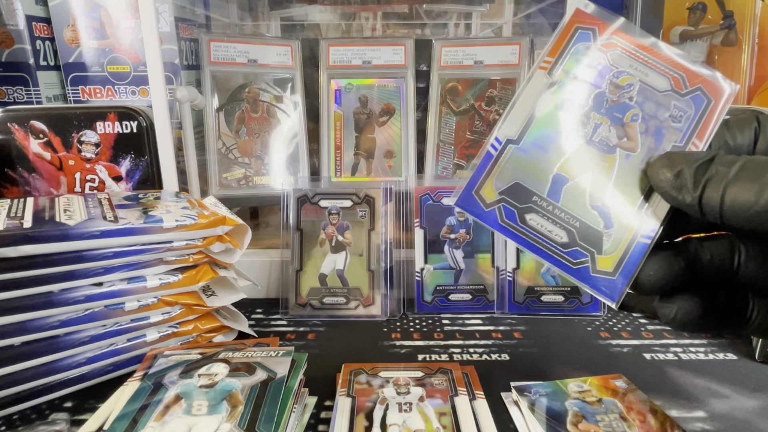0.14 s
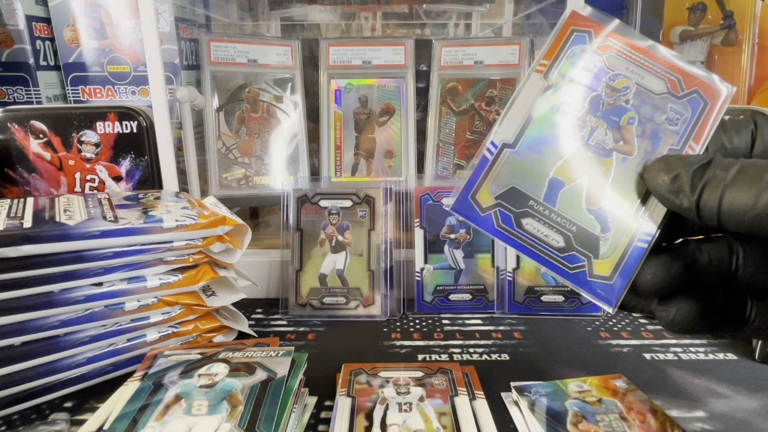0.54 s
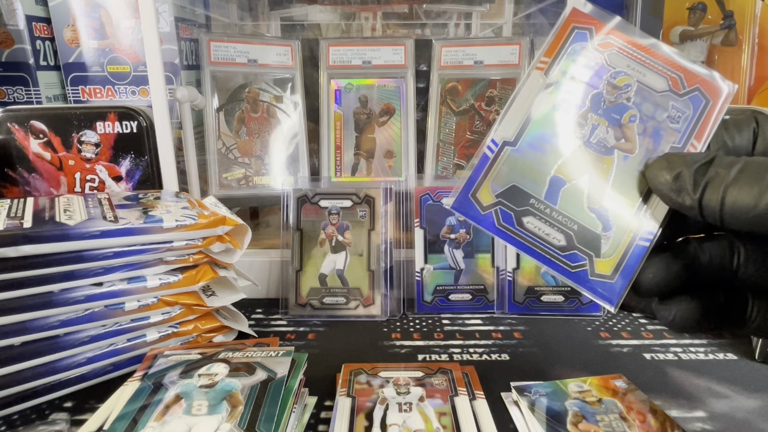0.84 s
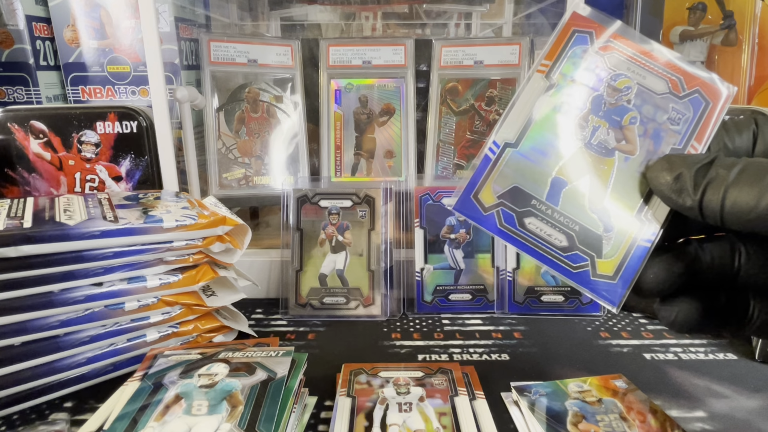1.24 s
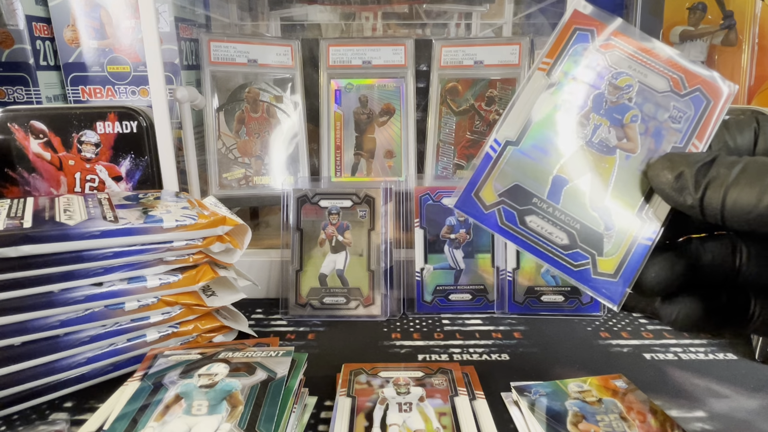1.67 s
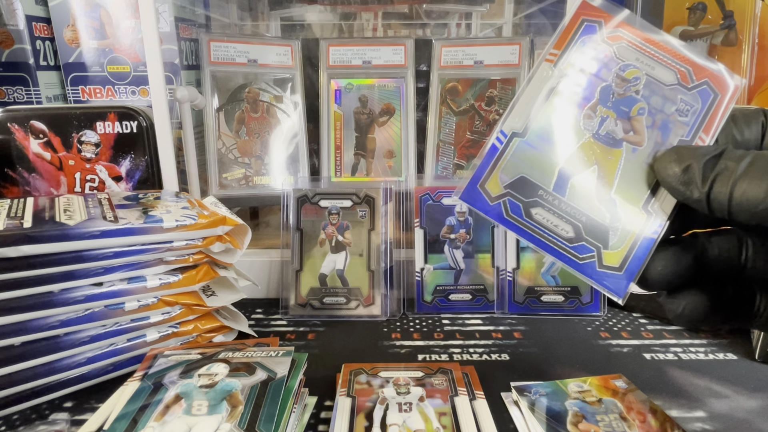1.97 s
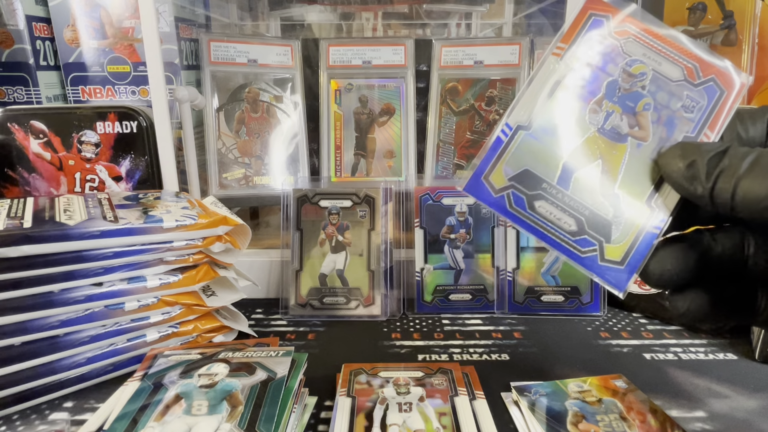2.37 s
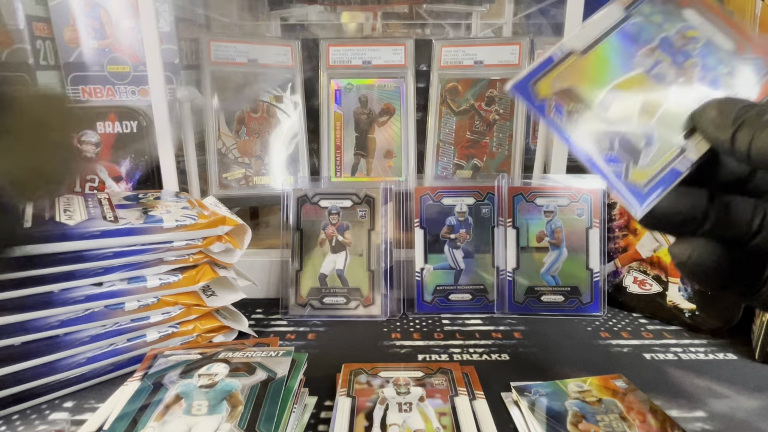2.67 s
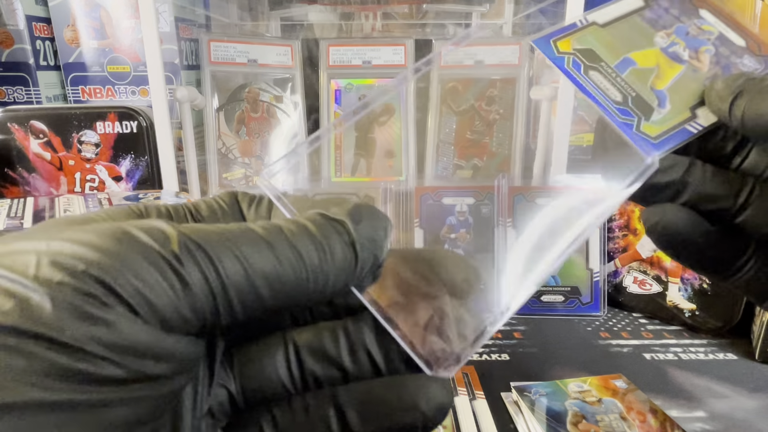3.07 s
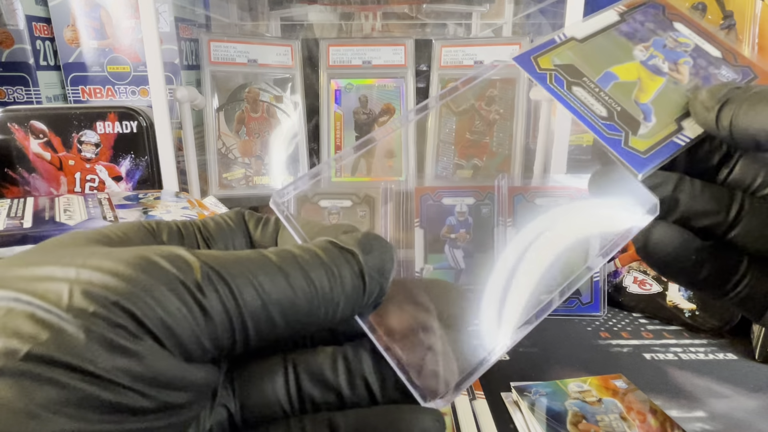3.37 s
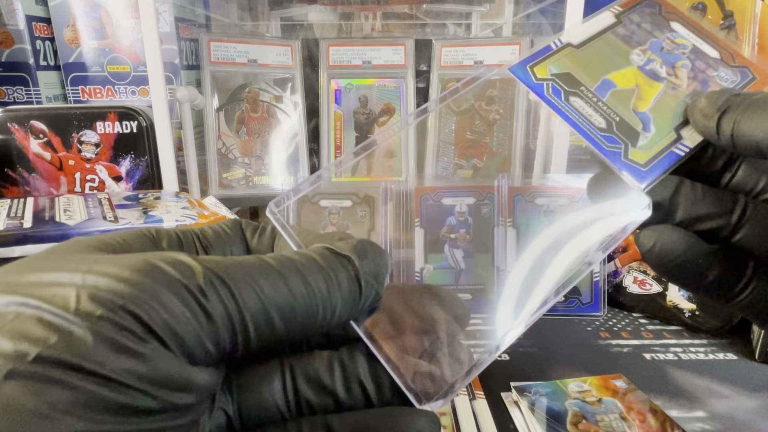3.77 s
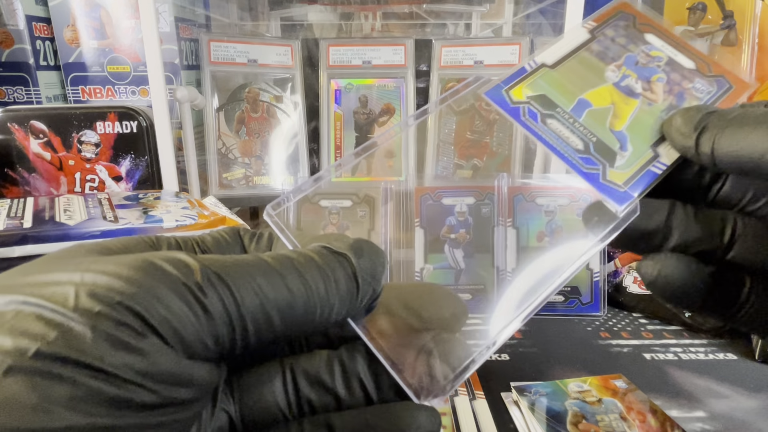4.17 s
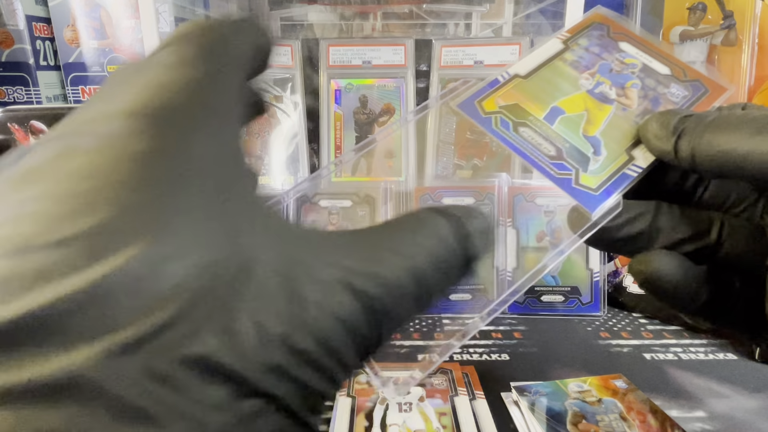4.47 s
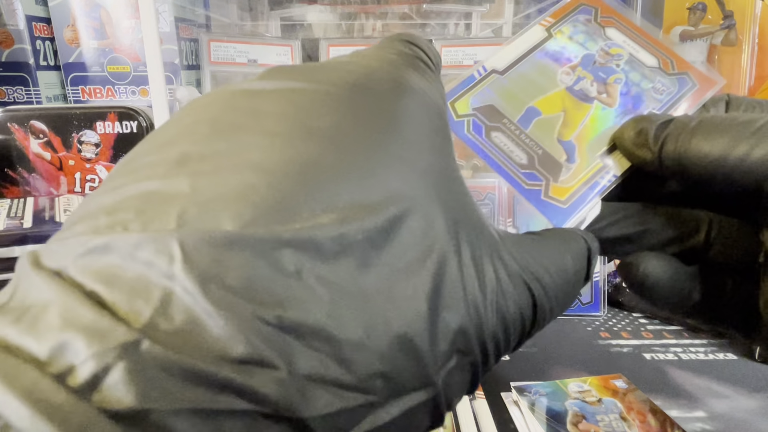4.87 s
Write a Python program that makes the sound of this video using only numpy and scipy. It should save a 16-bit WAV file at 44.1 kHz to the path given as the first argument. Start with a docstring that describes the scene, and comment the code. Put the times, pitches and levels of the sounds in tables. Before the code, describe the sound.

Close handling of a thin plastic card sleeve in gloved fingers, in a small room with quick desk reflections and a faint, wavering low hum. From 0 to 0.65 s come scattered dry snaps and short papery drags; a softer patch follows to 1.1 s. Snaps cluster at 1.1-1.4 s, and a strong crackling snap with a dull bump lands near 1.48 s. Light rubbing leads to squeaky drags and small bumps at 2.0-2.3 s. Then it nearly falls silent, with faint scuffs, hissy slides and tiny ticks until about 4.2 s. Small edge clicks gather at 4.25-4.6 s and sharpen at 5.1-5.4 s. At 5.64 s one hard, bright plastic knock is the loudest event, very short. Gritty sliding, a faint squeak and a scuff near 6.17 s follow, then quiet ticks. A soft thump at 7.0 s and a firmer double bump with a click at 7.2 s close it.

```python
"""A thin sleeve round a trading card, held in gloved hands: shaped friction noise rings card and film modes.
Stick-slip squeaks are short tones of unsteady pitch. Feeding the card into a rigid plastic holder gives
soft hiss, ticks and scuffs from friction noise. One hard knock and dull hand bumps are smooth pushes
on decaying modes. Early echoes and a faint tail form the small room, over a wavering mains hum and
coloured noise."""
import sys
import numpy as np
from scipy import signal
from scipy.fft import rfft, irfft
from scipy.io import wavfile
from scipy.ndimage import map_coordinates

SR = 44100
rng = np.random.default_rng(int(sys.argv[2]) if len(sys.argv) > 2 else 0)


def unload_audio(sound):
    """Save the sound as a 16-bit wav file, at the path given as the first command line argument."""
    columns = np.transpose(np.atleast_2d(sound))
    # keep every value between -1 and 1, then stretch to whole-number steps
    steps = np.round(np.clip(columns, -1, 1) * 32767)
    wavfile.write(sys.argv[1], SR, steps.astype(np.int16))


N = 319284

# Contact levels are relative drives; brightness is scratch, hiss or edge level relative to ring or body.
# fingers rub the sleeve: start t/s, length/s, card ring level/dB, brightness/dB
RUBS = [(0.0, 0.058, -55.5, -11.5), (.17, 0.047, -60.5, -7), (.27, 0.061, -60.5, -3), (.82, 0.23, -64, -4),
        (1.13, .06, -60.5, -11), (1.39, 0.51, -58.5, -7), (1.97, .25, -47.5, -8.5)]
# sleeve sticks and snaps free: t/s, card ring level/dB, brightness/dB
SNAPS = [(.057, -35.5, -36), (.12, -30, -19), (0.166, -43, -24), (.252, -32, -15), (.336, -37, -15.5),
         (0.579, -29, -18.5), (.652, -32.5, -26), (0.894, -41.5, -1.5), (1.0856, -56, 11.5),
         (1.11, -45, 16.5), (1.1197, -59, 18), (1.1631, -31.5, -8.5), (1.218, -32, -21), (1.248, -28, -16),
         (1.299, -40, -24), (1.378, -34, -16), (1.475, -21, -15), (1.4825, -16.5, -22.5),
         (2.222, -29, -13.5), (2.967, -51.5, -34)]
# sleeve drags under a finger: peak t/s, length/s, card ring level/dB
DRAGS = [(0.148, .018, -44.5), (0.623, 0.035, -39), (0.975, .012, -43.5), (1.153, 0.039, -41),
         (1.416, .014, -32.5), (1.473, .007, -24), (1.514, .022, -35.5), (1.586, .014, -38),
         (1.685, 0.057, -43), (1.798, 0.019, -40.5), (1.83, .014, -44), (1.865, 0.0091, -45),
         (2.014, 0.033, -29.5), (2.045, 0.005, -27), (2.1, 0.018, -29.5), (2.23, 0.033, -37.5),
         (2.317, 0.0081, -88)]
# short film rings near 3 kHz, often with a snap, tick or push: t/s, level/dB
FILM_RINGS = [(0.135, -43), (.148, -56.5), (0.582, -28.5), (.588, -46), (.654, -40.5), (1.479, -27),
              (1.809, -51), (1.866, -53), (2.22, -38), (2.388, -67.5), (2.531, -51.5), (2.653, -52.5),
              (2.791, -62), (4.35, -52), (4.385, -53), (4.425, -54), (5.138, -58), (5.213, -52),
              (6.336, -54.5)]
# plastic sticks and lets go: centre t/s, Gaussian sigma/s, pitch at centre f/Hz, level/dB
SQUEAKS = [(0.15, 0.016, 1029, -44), (1.221, .0036, 1080, -36), (2.005, 0.0081, 1097, -24.5),
           (2.056, .004, 755, -34), (2.109, .004, 753, -31), (2.19, .016, 880, -34),
           (2.116, .004, 2183, -40), (2.225, .006, 1950, -32), (2.241, .0036, 884, -34.5),
           (2.432, 0.009, 2350, -67.5), (5.944, 0.0094, 1746, -52), (6.174, 0.0018, 1774, -47)]
# sleeve is pushed along the holder: start t/s, length/s, body level/dB, brightness/dB
PUSHES = [(2.393, 0.07, -79, -5), (2.513, 0.12, -69.5, 6), (2.71, 0.06, -75, 8), (2.86, 0.23, -86, 4),
          (3.999, 0.056, -86, 7), (4.165, 0.028, -72.5, 10), (4.339, 0.11, -67, 4), (4.496, 0.1, -78, 12),
          (4.75, 0.32, -85.5, 6.5), (5.158, 0.2, -72, 4.5), (5.654, 0.059, -62.5, 0.5),
          (5.782, 0.13, -65.5, 5), (5.926, 0.055, -61, -3.5), (6.127, 0.051, -76, 11.5),
          (6.347, 0.084, -70.5, 2.5), (6.525, 0.051, -82, 10.5), (6.776, 0.044, -86, 9.5),
          (7.005, 0.13, -77, 4)]
# edge catches on the holder: t/s, body level/dB, brightness/dB
TICKS = [(3.049, -76.5, 11), (3.14, -78, 9), (3.28, -72, 1), (4.246, -66, 4), (4.342, -54, -8.5),
         (4.402, -64, -3), (4.4499, -53, 11), (4.594, -66, 5.5), (5.137, -57.5, -2.5), (5.187, -41.5, -11),
         (5.215, -47, -11), (5.4183, -39, 0), (5.702, -50, -0.5), (6.357, -48.5, -4.5),
         (6.9813, -51.5, -21), (7.2037, -40, 2)]
# sleeve and gloves scuff over the holder: peak t/s, length/s, body level/dB, brightness/dB
SCUFFS = [(2.429, 0.0093, -61.5, -21), (2.559, 0.011, -52, 1.5), (2.639, 0.025, -68, 11.5),
          (5.642, 0.012, -41, -9.5), (6.15, 0.021, -49, -7), (6.172, 0.0058, -34, -14),
          (7.138, 0.019, -61.5, -2.5), (7.21, 0.0099, -40.5, -4.5)]
# card knocks on the holder and rebounds: t/s, level/dB
KNOCKS = [(5.64, -4), (5.6409, -10.5)]
# dull bumps of the hands: t/s, level/dB, contact half width at 1/e/s
BUMPS = [(1.251, -48, 0.00086), (1.477, -21.5, 0.0011), (1.515, -34.5, .0007), (1.812, -36.5, 0.00093),
         (2.015, -28.5, 0.00044), (2.11, -26.5, 0.00021), (2.890, -44, 0.00044), (3.287, -54.5, .001),
         (5.642, -25, 0.00047), (6.184, -42.5, 0.00069), (6.9885, -22, 0.00097), (7.206, -24.5, 0.0001),
         (7.217, -15, 0.00038)]
# resonances of card, film and holder: f/Hz, width/Hz, level/dB
CARD_MODES = [(186.2, 35, -5.5), (386.3, 130, -10), (752, 167, -3.5), (1053, 98, 2.5), (1538, 220, -6),
              (1648, 120, 0), (2106, 110, -11.5)]
FILM_MODES = [(2664, 350, -3), (3030, 510, -0.5)]
HOLDER_MODES = [(405, 250, -5), (800, 600, -2), (1680, 160, 6), (2440, 760, 1.5), (3100, 530, -2.5)]
# ringing after knock and bump: f/Hz, level/dB, t60/s, left over right level/dB, left lead/s
KNOCK_MODES = [(265, -17.5, 0.018, 3, 0.0035), (375, -20.5, 0.073, 0.5, 0.0063),
               (787, -14.5, 0.014, 5, .00017), (1144, -8, .016, 5, .00043),
               (1645, 2.5, 0.013, -2.5, .00007), (2250, -23.5, .02, -5, -0.02)]
BUMP_MODES = [(105, -22, 0.18, 1.5, 0.0087), (177, -3.5, 0.03, 0, -0.0076), (270, -3, 0.014, 5, 0.0086),
              (400, -21, 0.006, 2, -0.014), (693, -11.5, .04, -1.5, -.00015), (1010, -17, 0.039, -1, 0.022)]
# spectra of sleeve scratch, holder edge, sliding hiss and room noise: f/Hz, relative density level/dB
SCRATCH = [(2500, -5), (3700, -6), (4400, 0), (4900, 0), (5600, 3.5), (6700, -1.5), (8000, -9.5),
           (11500, -17.5), (13000, -29.5), (14500, -33)]
EDGE = [(2000, -28.5), (3200, -1), (6400, -2), (8500, -10.5), (11500, -6), (15500, -23.5)]
HISS = [(2000, -15), (3300, 3), (4800, 3), (6500, 5), (8200, -4.5), (10500, 0), (12500, -9), (14000, -17.5),
        (16000, -27)]
ROOM_TONE = [(25, -12.5), (42, 0), (80, 0), (130, -7), (280, -4.5), (400, -15), (600, -23.5), (1000, -29.5),
             (2500, -36), (6000, -34), (11000, -45.5), (15000, -57)]
# desk echoes, one list per channel (left, right): delay/s, signed linear gain [1]
ECHOES = [
    [(.0037, 0.061), (.0057, -0.13), (.0093, 0.24)],
    [(.0037, -0.22), (.0068, 0.24), (.0112, 0.35)],
]
# background sinks and returns: centre t/s, half width at 1/e/s, hum depth/dB
HUM_DIPS = [(.1, 0.32, 13.5), (2.25, 0.32, 5), (3.856, 0.39, 12), (5.692, .3, 11.5)]

RUB_ATTACK_S, RUB_RELEASE_S = 0.0063, 0.029
RUB_UNEVEN_DB, RUB_UNEVEN_PER_S = 3, 40
SNAP_RISE_S, SNAP_FALL_S = 0.0003, 0.003
DRAG_RISE_SHARE, DRAG_FALL_SHARE = 0.59, 0.45  # of its length
# scratch of a drag at the usual ring level; scratch dB per dB of ring
DRAG_SCRATCH_DB, DRAG_SCRATCH_DB_PER_DB, USUAL_DRAG_DB = -51.5, 0.97, -39
FILM_DB, FILM_FROM_CARD = -7.5, 0.55  # offset from the card/scratch blend; card's share in it
FILM_RING_RISE_S, FILM_RING_FALL_S = 0.00061, 0.006
SQUEAK_SAG_PER_S = 2.5  # exponential fall of pitch
PUSH_ATTACK_S, PUSH_RELEASE_S = 0.029, 0.072
TICK_RISE_S, TICK_FALL_S = 0.00015, 0.0021
SCUFF_RISE_SHARE, SCUFF_FALL_SHARE = 0.37, 1  # of its length
KNOCK_CONTACT_S = 0.00019
REBOUND_S, REBOUND_DB = 0.0066, -10
SETTLE_S, SETTLE_DB, SETTLE_LOSS_DB = 0.022, -13.5, 3  # spacing, first touch, loss per further touch
PATCH_HZ, PATCH_S = 531.4, 0.016  # width and life of a passing resonance of flexing plastic
HUM_DB = -56.5  # before dips and flutter
HUM_FLUTTER_DB, HUM_FLUTTER_PER_S = 2.85, 15
CUTOFF_HZ = 16000


def sleeve():
    """Friction on the sleeve rings card and thin film, and scratches in the treble."""
    uneven = from_db(RUB_UNEVEN_DB * drift(RUB_UNEVEN_PER_S))
    rub_ring, rub_scratch = uneven * holds(RUBS, RUB_ATTACK_S, RUB_RELEASE_S)
    on_card, on_film, on_surface = slips()
    short_ring, = strokes([(s, FILM_RING_RISE_S, FILM_RING_FALL_S, db) for s, db in FILM_RINGS])

    def card_ring():
        rub = rub_ring * from_db(4) * friction(270, 6.2, 0.23)
        slipping = from_db(-1.5) * contact(on_card, 0.69)
        return resonate(rub + slipping, CARD_MODES, grip_db=4.5)

    def film_ring():
        rub = rub_scratch * from_db(2.4) * friction(300, 5.0, 0.42)
        slipping = contact(on_film, 0.99)
        return resonate(rub + slipping + contact(short_ring, 0.28), FILM_MODES, grip_db=3.5)

    def surface_scratch():
        rub = rub_scratch * friction(1200, 6.4, 0.7)
        return colour(rub + from_db(-0.5) * contact(on_surface, 0.87), SCRATCH)

    card = spread(card_ring, 0.00037, 2.2, 0.28)
    film = spread(film_ring, 0.00044, 0.3, 0.5)
    scratch = spread(surface_scratch, 0.00043, 6.7, 0.46)
    ringing = flex(high_pass(card, 130) + high_pass(film, 1200), depth_db=3.5)
    return ringing + high_pass(flex(scratch, depth_db=7.0), 2500)


def slips():
    """Snaps share one abrupt shape; drags swell and die with their length, louder ones scratching more."""
    rows = []
    for s, db, bright in SNAPS:
        rows.append(slip(s, SNAP_RISE_S, SNAP_FALL_S, db, db + bright))
    for s, length, db in DRAGS:
        scratch_db = DRAG_SCRATCH_DB + DRAG_SCRATCH_DB_PER_DB * (db - USUAL_DRAG_DB)
        rows.append(slip(s, DRAG_RISE_SHARE * length, DRAG_FALL_SHARE * length, db, scratch_db))
    return strokes(rows)


def slip(s, rise, fall, card_db, scratch_db):
    """A slip drives the film at a blend of card ring and scratch levels."""
    film_db = FILM_DB + FILM_FROM_CARD * card_db + (1 - FILM_FROM_CARD) * scratch_db
    return s, rise, fall, card_db, film_db, scratch_db


def squeaks(waver=0.065, overtone_db=-15):
    """Brief stick-slip tones of unsteady, sagging pitch with a weak octave."""
    t, out = seconds(), np.zeros(N)
    unsteady = 1 + waver * drift(400)
    for s, sigma, hz, db in SQUEAKS:
        near = np.abs(t - s) < 4 * sigma
        since = t[near] - s
        pitch = hz * unsteady[near] * np.exp(-SQUEAK_SAG_PER_S * since)
        phase = 2 * np.pi * np.cumsum(pitch) / SR
        tone = np.sin(phase) + from_db(overtone_db) * np.sin(2 * phase)
        out[near] += from_db(db) * np.exp(-(since / sigma) ** 2 / 2) * tone
    return place(out, 0.00038, 7.6)


def holder():
    """The sleeve glides over stiff plastic with a gritty hiss and catches on its edges."""
    glide_body, glide_hiss = holds(PUSHES, PUSH_ATTACK_S, PUSH_RELEASE_S)
    on_body, on_edge = catches()

    def body_ring():
        glide = glide_body * from_db(2.0) * friction(250, 6.2, 0.8)
        catching = from_db(1.0) * contact(on_body, 0.6)
        return resonate(glide + catching, HOLDER_MODES, grip_db=4.5)

    def sliding_hiss():
        uneven = from_db(1.8 * drift(50))
        return colour(glide_hiss * uneven * friction(400, 4.0, 0.7), HISS)

    def edge_noise():
        return colour(contact(on_edge, 1.0), EDGE)

    body = spread(body_ring, 0.00005, 0.8, 0.93)
    hiss = spread(sliding_hiss, 0.00005, 1.9, 1.34)
    edge = spread(edge_noise, 0.00005, 1.5, 1.0)
    return flex(body, depth_db=5.0) + high_pass(flex(hiss + edge, depth_db=4.0), 1700)


def catches():
    """Short ticks and longer scuffs drive the holder's body and its edge."""
    rows = [(s, TICK_RISE_S, TICK_FALL_S, db, db + bright) for s, db, bright in TICKS]
    for s, length, db, bright in SCUFFS:
        rows.append((s, SCUFF_RISE_SHARE * length, SCUFF_FALL_SHARE * length, db, db + bright))
    return strokes(rows)


def blows():
    """Hard knock of plastic on plastic and soft bumps of the hands, each ringing its modes."""
    knock = strike([(s, db, KNOCK_CONTACT_S) for s, db in KNOCKS], KNOCK_MODES)
    bumps = strike(bounces(), BUMP_MODES)
    return high_pass(knock, 73) + high_pass(bumps, 65)


def bounces(count=3):
    """Every bump springs back once, then the hand settles in soft touches."""
    after = [(0, 0), (REBOUND_S, REBOUND_DB)]
    after += [(SETTLE_S * (k + 1), SETTLE_DB - SETTLE_LOSS_DB * k) for k in range(count)]
    return [(s + delay, db + loss, contact_s) for s, db, contact_s in BUMPS for delay, loss in after]


def strike(blows, modes):
    """Smooth pushes set decaying modes ringing; each mode has its own stereo level and lead."""
    t, push, out = seconds(), np.full(N, 1e-18), 0
    for s, db, contact_s in blows:
        near = slice(int((s - 10 * contact_s) * SR), int((s + 10 * contact_s) * SR))
        pulse = np.exp(-((t[near] - s) / contact_s) ** 2)
        push[near] += from_db(db) * pulse / (contact_s * SR * np.sqrt(np.pi))  # area set by level
    change = signal.lfilter([1, 0, -1], [2], push) + 1e-18
    for hz, db, t60, left_db, lead_s in modes:
        r, w = from_db(-60 / (t60 * SR)), 2 * np.pi * hz / SR
        ring = signal.lfilter([1], [1, -2 * r * np.cos(w), r * r], change)
        out = out + from_db(db) * place(ring, lead_s, left_db)
    return out


def friction(per_s, spread_db, smooth):
    """Random stick-slip releases of uneven size over a smooth hiss; unit power."""
    sizes = from_db(spread_db * np.minimum(rng.exponential(1, N), 3)) * rng.choice([-1, 1], N)
    grains = rms_one(sizes * (rng.random(N) < per_s / SR))
    return rms_one(grains + smooth * rng.standard_normal(N))


def contact(stroke, snap):
    """Force of a contact: a sudden release and dense friction under its envelope."""
    envelope, release = stroke
    return snap * release + envelope * friction(3500, 2.5, 0.79)


def strokes(rows):
    """Per level column: envelope of contacts that swell and die, and impulses that weaken with slow rise."""
    t = seconds()
    power, snaps = np.zeros((2, len(rows[0][3:]), N))
    for s, rise, fall, *levels in rows:
        near = slice(max(0, int((s - 10 * rise) * SR)), int((s + 10 * fall) * SR))
        since = t[near] - s
        shape = np.exp(np.minimum(since / rise, -since / fall))
        power[:, near] += (from_db(levels)[:, None] * shape) ** 2
        snaps[:, int(s * SR)] = from_db(levels) * np.sqrt(fall * SR / 2) * np.exp(-rise / 0.001)
    return zip(np.sqrt(power), snaps)


def holds(rows, attack_s, release_s):
    """Body and treble gains of sustained movements: each sets in, holds and dies away."""
    t, power = seconds(), np.full((2, N), 1e-18)
    for s, length, db, bright in rows:
        end = s + length
        near = slice(max(0, int((s - 10 * attack_s) * SR)), int((end + 10 * release_s) * SR))
        slope = np.minimum((t[near] - s) / attack_s, (end - t[near]) / release_s)
        shape = np.exp(np.minimum(0, slope))
        power[:, near] += (from_db([[db], [db + bright]]) * shape) ** 2
    return np.sqrt(power)


def resonate(x, modes, grip_db=0):
    """Parallel resonances with strengths that wander with the grip; scaled for white-noise power."""
    out, power = 0, 0
    for k, (hz, width, db) in enumerate(modes):
        r = np.exp(-np.pi * width / SR)
        top = (1 - r * r) / 2
        drive = x * from_db(db + grip_db * drift(25)) + 1e-18
        poles = [1, -2 * r * np.cos(2 * np.pi * hz / SR), r * r]
        out = out + (-1) ** k * signal.lfilter([top, 0, -top], poles, drive)
        power += top * from_db(db) ** 2
    return out / np.sqrt(power)


def flex(x, depth_db, size=256):
    """As plastic flexes, narrow resonances come and go at random; mean gain power is one."""
    hz, s, cells = signal.stft(x, SR, nperseg=size)
    field = rng.standard_normal((128, 2048))
    at = np.meshgrid(hz / PATCH_HZ, s / PATCH_S, indexing="ij")
    wander = map_coordinates(field, at, order=1, mode="wrap")
    return signal.istft(cells * rms_one(from_db(depth_db * wander)), SR, nperseg=size)[1][..., :N]


def colour(x, spectrum, size=4096):
    """Causal minimum-phase filter with the given spectrum; white noise keeps its power."""
    hz, db = np.transpose(spectrum)
    grid = np.maximum(np.arange(size // 2 + 1) * SR / size, 1)
    gain = from_db(np.interp(np.log(grid), np.log(hz), db))
    cepstrum = irfft(np.log(gain))
    cepstrum[1:size // 2] *= 2  # fold to minimum phase
    cepstrum[size // 2 + 1:] = 0
    response = irfft(np.exp(rfft(cepstrum)))
    return signal.oaconvolve(x, response / np.linalg.norm(response))[:N]


def high_pass(x, hz):
    """Second-order low cut."""
    return signal.sosfilt(signal.butter(2, hz, "high", fs=SR, output="sos"), x)


def place(x, lead_s, left_db):
    """Stereo level and delay: positive values make the left louder and earlier, negative the right."""
    t = seconds()
    right = np.interp(t - round(lead_s * SR) / SR, t, x)
    return np.array([x * from_db(left_db / 2), right * from_db(-left_db / 2)])


def spread(make, lead_s, left_db, apart):
    """Broad surface: a shared sound plus an independent one of opposite sign in the two channels."""
    own = place(make(), lead_s, left_db) * [[1], [-1]]
    shared = place(make(), lead_s, left_db)
    return (shared + apart * np.roll(own, SR // 1500, axis=1)) / np.hypot(1, apart)


def drift(rate):
    """Linear wander between random knots of unit spread, rate knots per second."""
    knots = rng.standard_normal(8000)
    return np.interp(seconds() * rate, np.arange(len(knots)), knots)


def from_db(db):
    """Decibels to gain."""
    return 10 ** (np.asarray(db) / 20)


def rms_one(x):
    """Scale to unit rms."""
    return x / np.sqrt(np.mean(x ** 2) + 1e-20)


def seconds():
    """Time of every sample."""
    return np.arange(N) / SR


def room(dry, t60=0.37, wet_db=-21, dull_hz=5000):
    """Quick echoes off the desk and a faint, dulled, decaying noise tail."""
    t, out = seconds(), dry.copy()
    age = t[:SR // 2]
    for side, echoes in enumerate(ECHOES):
        for delay, gain in echoes:
            out[side] += gain * np.interp(t - delay, t, dry[side])
        tail = rng.standard_normal(len(age)) * from_db(-60 * age / t60) * (age > 0.006)
        tail = signal.lfilter(*signal.butter(1, dull_hz, fs=SR), tail / np.linalg.norm(tail))
        out[side] += from_db(wet_db) * signal.oaconvolve(dry[side], tail)[:N]
    return out


def background(hum_hz=58.8, tone_db=-68, follow=0.42):
    """A low sine of wavering pitch and level, and room noise that partly follows its dips."""
    dips_db = sum(depth * np.exp(-((seconds() - s) / half) ** 2) for s, half, depth in HUM_DIPS)
    level = from_db(HUM_DB - dips_db)
    phase = 2 * np.pi * np.cumsum(hum_hz + 0.5 * drift(13.0)) / SR
    flutter = from_db(HUM_FLUTTER_DB * drift(HUM_FLUTTER_PER_S))
    hum = place(level * flutter * np.sqrt(2) * np.sin(phase), 0, 3.2)
    air = spread(lambda: colour(rng.standard_normal(N), ROOM_TONE), 0, 3.1, 0.3)
    return hum + from_db(tone_db) * rms_one(level) ** follow * high_pass(air, 26)


def scene():
    """All handling sounds in the room, over its hum."""
    return room(sleeve() + squeaks() + holder() + blows()) + background()


def record(dry):
    """Steep elliptic low-pass at the top of the band."""
    return signal.sosfilt(signal.ellip(10, 0.1, 80, CUTOFF_HZ, fs=SR, output="sos"), dry)


dry = scene()
out = record(dry)
unload_audio(out)
```